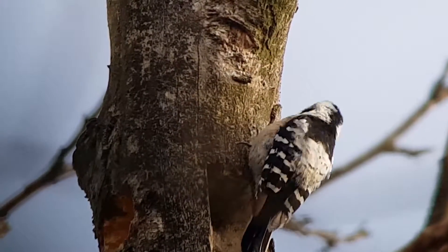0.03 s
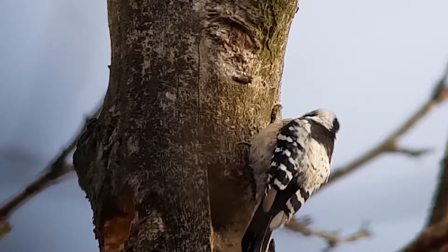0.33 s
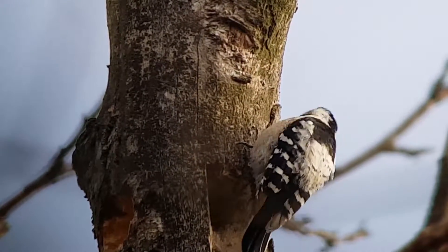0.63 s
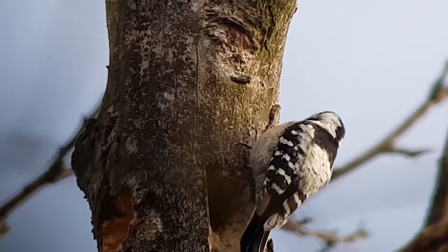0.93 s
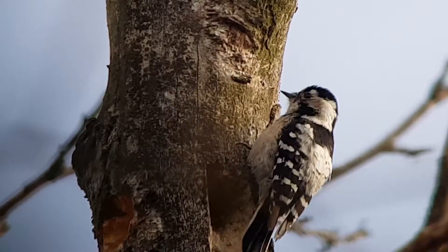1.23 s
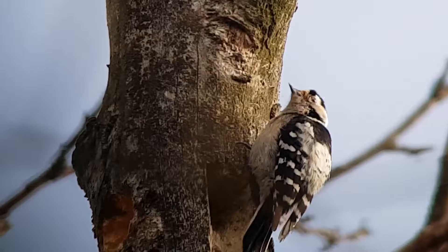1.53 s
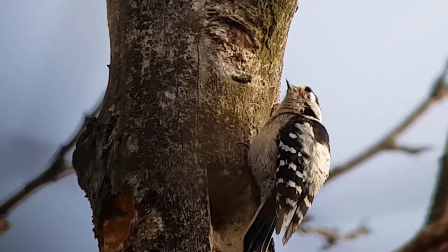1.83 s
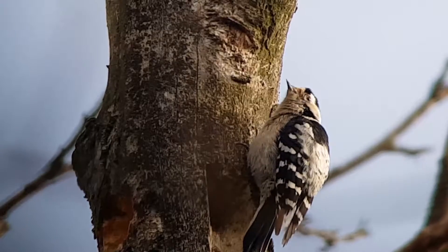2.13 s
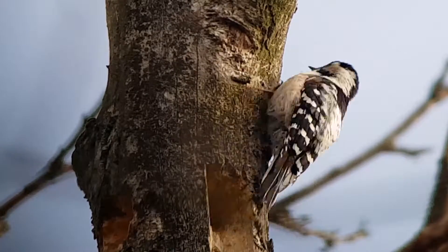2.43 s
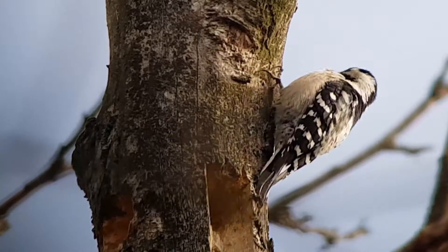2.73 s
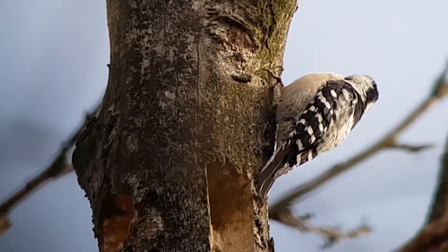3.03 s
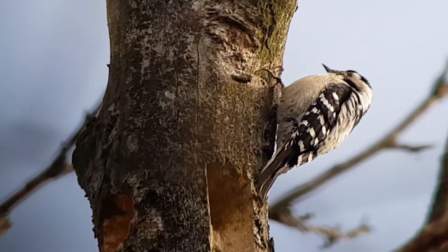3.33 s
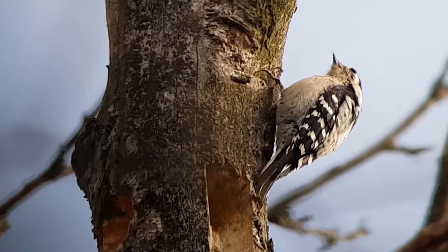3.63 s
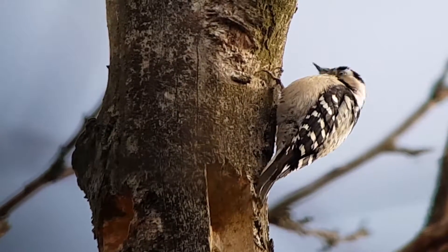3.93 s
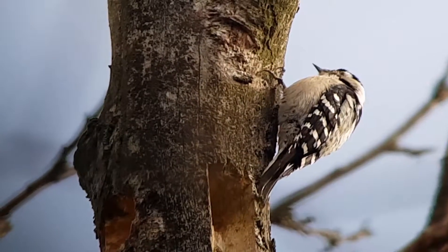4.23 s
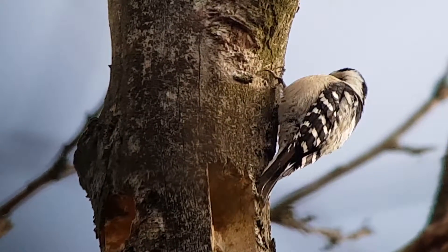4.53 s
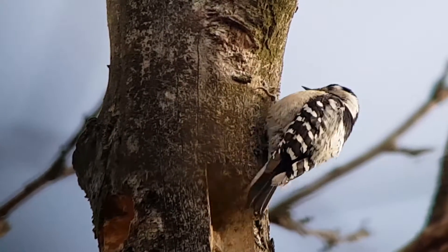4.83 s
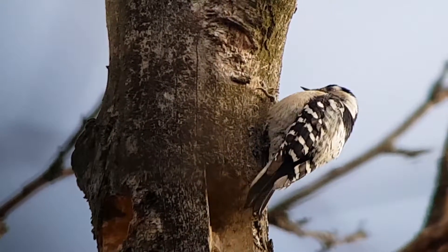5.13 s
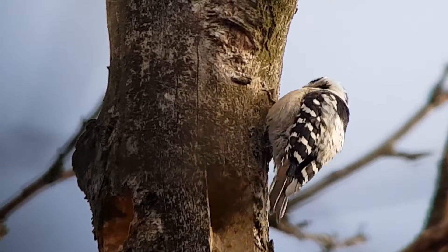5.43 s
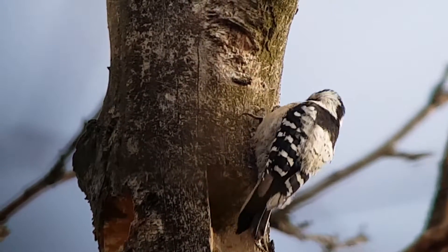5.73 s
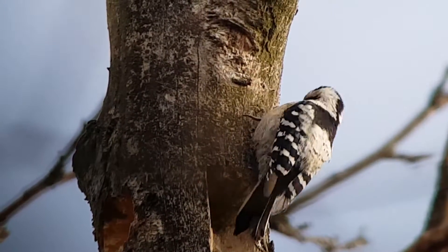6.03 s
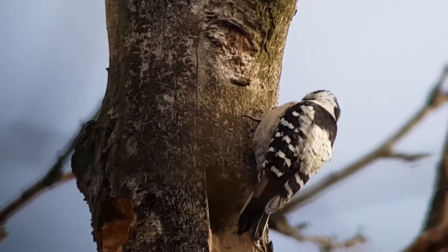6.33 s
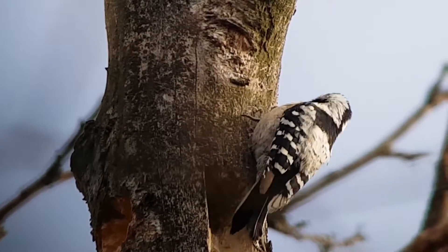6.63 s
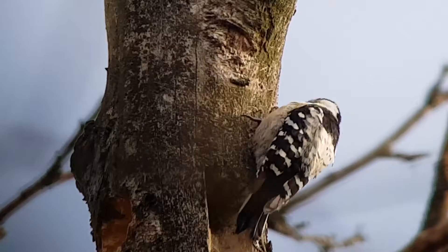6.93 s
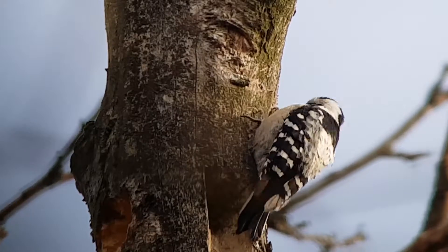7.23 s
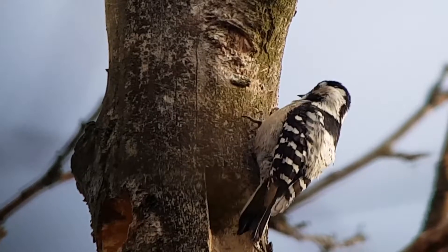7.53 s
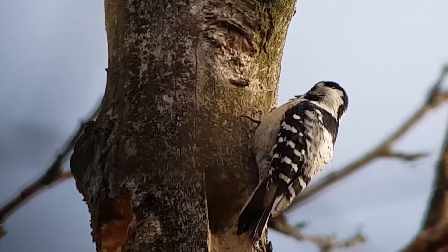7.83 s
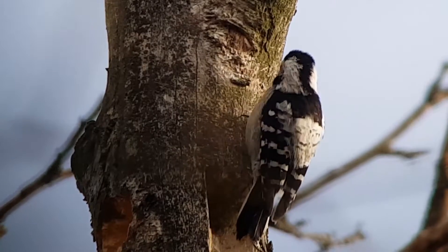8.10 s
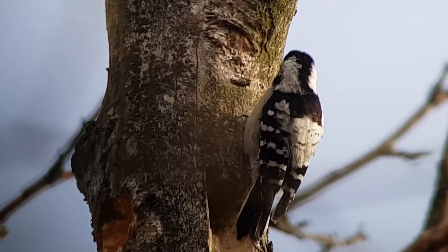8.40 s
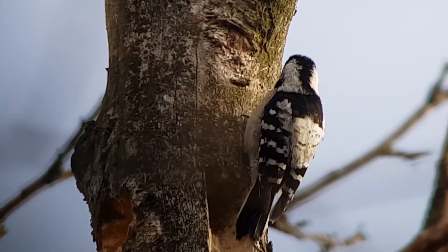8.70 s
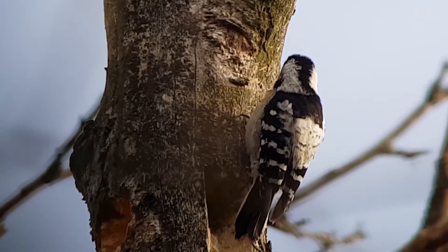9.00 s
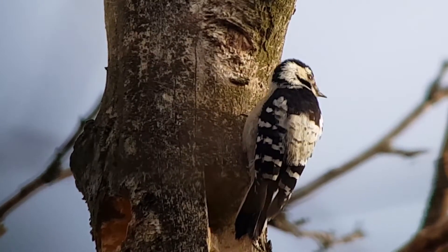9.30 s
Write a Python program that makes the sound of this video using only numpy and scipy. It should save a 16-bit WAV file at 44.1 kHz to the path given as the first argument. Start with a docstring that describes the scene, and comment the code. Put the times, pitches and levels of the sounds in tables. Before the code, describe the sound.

A woodpecker is already drumming on a dead trunk at the start, a fast, even roll of hollow wooden knocks that stops at about 1 second with a faint scratch on bark. A small songbird then gives thin, high, level whistles, alternating them with swooping notes from about 3 to 7 seconds. Farther off, other birds chirp and chatter, with short, hoarse trills near 1, 3.7 and 7 seconds. At about 5.8 seconds a second, longer roll starts softly, grows, and slows before ending at 7.5 seconds. A tiny bark tick and a faint run of short, quick calls follow between 8 and 9 seconds. The drumming is the loudest and nearest sound, while the birds echo among the trees. A low, distant rumble and faint hiss continue throughout, with a few soft puffs of wind on the microphone between 2.5 and 5 seconds.

```python
"""In quiet woodland, a small woodpecker drums two rolls on a dead trunk: each blow of the bill excites
the wood's damped modes, and claws and bill scratch the bark. A tit answers with thin, level whistles
and swooping notes while other birds chatter farther off, each note a frequency-modulated pure tone.
Scattering from the trees makes the birds reverberate over a low, distant rumble, a faint hiss
and a few soft puffs of wind."""
import sys
import numpy as np
from scipy import signal
from scipy.fft import rfft, irfft
from scipy.io import wavfile
from scipy.ndimage import uniform_filter1d

SR = 44100
rng = np.random.default_rng(int(sys.argv[2]) if len(sys.argv) > 2 else 0)


def persist_wave(psi):
    """Save psi, clipped to +-1, as 16-bit WAV."""
    counts = np.round(np.clip(psi, -1, 1) * 32767).astype(np.int16)
    wavfile.write(sys.argv[1], SR, np.atleast_2d(counts).T)


N = 417186


def woodpecker(near_db=-13, near_t60=0.043, echo_db=-11, mode_vary_db=1.9, click_t60=0.017, spread=3.35):
    """Impact excitation: each blow rings the trunk's modes; nearby limbs, then the trees, reflect it."""
    # Modes of the trunk. Each row: frequency in Hz, bandwidth in Hz, relative level in dB.
    trunk = [(617, 112, -9.5), (663.4, 35, -4), (927, 28, -10), (1132, 167, 0), (1353, 130, -7),
             (1524, 245, -4), (1770, 85, -10), (2070, 170, 3), (2223, 186, 1.5), (2560, 86, -18)]
    # Spectrum of the bill's click. Each row: frequency in Hz, relative level in dB.
    click_spectrum = [(200, -49), (900, -51), (2500, -30.5), (3000, -20), (3300, -27.5), (4150, -22.5),
                      (4500, -28.5), (5200, -29.5), (6500, -40.5), (8500, -49), (15000, -70)]
    lead_s = .2  # the first roll is already under way
    lead = round(lead_s * SR)
    hz, t = np.fft.rfftfreq(4096, 1 / SR), np.arange(4096) / SR
    direct, around = np.zeros((2, N + lead))
    # heard from all sides at once, the modes blur together
    broad_power = sum((amp(db) / (1 + (2 * (hz - f) / (spread * w)) ** 2)) ** 2 for f, w, db in trunk)
    blurred = minimum_phase(np.sqrt(broad_power / spread))
    # an all-pass delay: the main resonance takes a moment to build up
    build_up = np.exp(-2j * np.arctan(np.pi * 0.00033 * (hz - 2150)))
    bill = minimum_phase(amp(spectrum_at(click_spectrum, hz)))
    for s, blow_db, click_db in blows():
        power = sum((amp(db + mode_vary_db * rng.standard_normal()) / (1 + (2 * (hz - f) / w) ** 2)) ** 2
                    for f, w, db in trunk)
        knock = irfft(rfft(minimum_phase(np.sqrt(power))) * build_up)
        scuff = rng.standard_normal(len(t)) * amp(-60 * t / click_t60)
        click = amp(click_db - 2.2) * signal.fftconvolve(scuff / np.linalg.norm(scuff), bill)[:len(t)]
        gain = amp(blow_db) / np.sqrt(np.mean((knock + click)[:220] ** 2))  # sets the first 5 ms rms
        add(direct, s + lead_s, gain * (knock + click))
        add(around, s + lead_s, gain * (blurred + click))
    limbs = rng.standard_normal((2, len(t))) * (t > .005) * amp(-60 * t / near_t60)
    limbs = limbs + 0.047 * limbs[::-1]  # both sides hear partly the same limbs
    near = signal.oaconvolve(around[None], limbs / np.linalg.norm(limbs[0]), axes=1)[:, :len(around)]
    return panned(direct + amp(near_db) * near + amp(echo_db) * forest(around), left_db=1.1)[:, lead:]


def blows(jitter_s=.0002, force_vary_db=1.3, click_vary_db=1.5):
    """A nearly periodic impulse train: the bill bounces at a beat that lengthens as the bird tires."""
    # Drum rolls. Each row: start, end, beat and lengthening of the last beat, all in seconds,
    # then the number of blows over which the bird tires.
    rolls = [(-.0981, 1.1, .04652, .0021, 8), (5.7869, 7.51, .0466, .00808, 3)]
    # How hard and how squarely the bill strikes, one curve a roll.
    # Each row: time in seconds, level of the blow in dB, relative level of its click in dB.
    drives = [
        [(.04, -39.5, 5), (.2, -36.5, 0), (.42, -40, -2), (.51, -36, -6), (.555, -43.5, -1), (.62, -38.5, -6),
         (.73, -36, 2.5), (.83, -38.5, -9), (.93, -38.5, -1), (1.08, -39, 8)],
        [(5.785, -49, 6), (5.93, -45.5, 6), (6.06, -38.5, 1.5), (6.15, -42.5, 4), (6.255, -36.5, 4),
         (6.33, -40.5, 12), (6.42, -46, 8), (6.54, -38, 6.5), (7.08, -38, 4), (7.27, -41.5, -1),
         (7.42, -44, 13.5), (7.49, -41.5, 8)],
    ]
    strikes = []
    for (s, end, beat, slowing, tiring), drive in zip(rolls, drives):
        when, force, sharpness = np.transpose(drive)
        count = int((end - s - slowing * tiring) / beat) + 1
        for k, (late, harder, sharper) in enumerate(rng.standard_normal((count, 3))):
            blow_db = np.interp(s, when, force) + force_vary_db * harder
            click_db = np.interp(s, when, sharpness) + click_vary_db * sharper
            strikes.append((s + jitter_s * late, blow_db, click_db))
            s += beat + slowing * np.exp((k + 2 - count) / tiring)
    return strikes


def bark_scratches(band_hz=(1500, 9000), echo_db=-20):
    """Friction: claws and bill catch on the bark in decaying bursts of grainy noise."""
    # Ticks and scratches. Each row: start in seconds, length in seconds, relative level in dB.
    scratches = [(0.991, 0.11, -67), (1.088, 0.13, -68), (8.291, 0.0044, -59), (8.544, 0.003, -75)]
    bursts = np.zeros(N)
    for s, length, db in scratches:
        t = np.arange(0, length, 1 / SR)
        grains = unit_rms(rng.standard_normal(len(t)) ** 3)
        add(bursts, s, amp(db) * 2 * grains * np.exp(-2 * t / length))
    direct = bandpass(bursts, band_hz)
    return direct + amp(echo_db) * forest(direct)


def tit(drop_hz=750, settle_s=0.0073, warble_hz=35, whistle_echo_db=-7, swoop_echo_db=-4):
    """Frequency modulation: whistles drop onto a held pitch; swoops dip and climb back with a warble."""
    # Level whistles. Each row: start and length in seconds, pitch and rise in Hz, nominal level in dB.
    whistles = [(0.997, 0.09, 5100, 40, -52), (1.571, 0.11, 5020, -2, -63.5), (2.277, 0.084, 5095, 36, -53),
                (2.466, 0.048, 5100, -41, -54), (3.319, 0.15, 5146, 107, -53.5),
                (4.083, 0.13, 5193, 33, -53.5), (4.84, 0.16, 5105, 40, -54), (5.692, 0.15, 5084, 50, -57),
                (6.523, 0.15, 5010, 187, -53), (7.520, 0.13, 4986, 128, -53.5),
                (7.858, 0.13, 5100, 2, -61.5), (8.663, 0.077, 5060, 68, -50)]
    # Swooping notes. Each row: start in seconds, lowest pitch in Hz, depth factor, nominal level in dB.
    swoops = [(2.933, 5760, 0.69, -52.5), (3.666, 5270, 1, -48.5), (4.45, 5220, 1, -50),
              (5.226, 5170, 1, -54), (6.061, 5180, 1, -54), (6.952, 5110, 0.84, -53.5)]
    # Course of one swoop. Each row: age in seconds, height above the lowest pitch in Hz at depth 1,
    # relative level in dB, warble depth in Hz.
    swoop_course = [(0, 1758, -15, -4), (.016, 883, -9.5, 3), (.036, 243, -5, 1), (0.061, 2.2, -1, 20),
                    (.08, 155, -6, 0), (.1, 397, -4.5, 101), (0.136, 904, -11, 241),
                    (0.177, 1538, -17, 221)]
    direct, scattered = np.zeros((2, N))
    for s, length, hz, rise, db in whistles:
        t = np.arange(0, length, 1 / SR)
        onset = np.exp(-t / settle_s)
        pitch = hz + drop_hz * onset + rise * (t / length) ** 2
        note = amp(db) * (1 - onset) ** 1.24 * syrinx(pitch, waver=0.005)
        add(direct, s, clear_path(db, near_db=-52) * note)
        add(scattered, s, amp(whistle_echo_db) * note)
    age, *curves = np.transpose(swoop_course)
    t = np.arange(0, age[-1], 1 / SR)
    height, shape_db, warble = (uniform_filter1d(np.interp(t, age, curve), 300) for curve in curves)
    for s, hz, depth, db in swoops:
        pitch = hz + depth * height + warble * np.sin(2 * np.pi * warble_hz * t)
        note = amp(db + shape_db) * syrinx(pitch, waver=0.0053)
        add(direct, s, clear_path(db + shape_db, near_db=-56.5) * note)
        # the quiet, high ends of the note scatter most
        add(scattered, s, amp(swoop_echo_db - 0.45 * shape_db) * note)
    return direct + forest(scattered)


def small_birds(warble_hz=33, echo_db=-2):
    """Frequency sweeps: thin glides from the crowns, some warbled by a sinusoid, some repeated."""
    # High calls. Each row: start and length in seconds, first and last pitch in Hz,
    # nominal level in dB, warble depth in Hz.
    thin_calls = [(0.105, 0.11, 3980, 3220, -63.5, 150), (.24, 0.029, 4200, 5000, -63, 0),
                  (0.319, 0.03, 4310, 5200, -60.5, 3), (.554, 0.061, 6820, 7000, -74, 305),
                  (0.905, .065, 4100, 3450, -67, 0), (1.848, .1, 7500, 7700, -75, 60),
                  (2.057, 0.028, 4360, 4823, -57.5, 0), (2.123, 0.052, 7100, 7050, -63.5, 320),
                  (2.568, 0.033, 6000, 7630, -60.5, -2), (2.619, 0.06, 7670, 6800, -55.5, 74),
                  (2.685, .11, 6350, 5660, -61.5, 653), (3.127, 0.027, 8900, 7600, -65, 0),
                  (3.553, .059, 7270, 7350, -71, 347), (5.291, 0.16, 7500, 7800, -72.5, 0),
                  (5.61, .05, 7900, 7620, -71, -2), (7.748, 0.043, 6800, 3930, -64.5, -2),
                  (8.032, 0.15, 8600, 7460, -67.5, 100), (9.425, 0.042, 7150, 7000, -61, 196)]
    # Evenly repeated rising calls. Each row: start, end, spacing and note length in seconds,
    # first and last pitch in Hz, nominal level in dB.
    repeats = [(5.518, 6.6, .457, .11, 4274, 4446, -67.5), (8.739, 9.15, .168, 0.039, 4460, 4680, -71)]
    direct, scattered = np.zeros((2, N))
    repeated = [(s, *call, 0) for start, end, gap, *call in repeats for s in np.arange(start, end, gap)]
    for s, length, first, last, db, warble in thin_calls + repeated:
        t = np.arange(0, length, 1 / SR)
        pitch = glide(length, first, np.sqrt(first * last), last)
        note = amp(db) * syrinx(pitch + warble * np.sin(2 * np.pi * warble_hz * t), waver=0.01)
        add(direct, s, clear_path(db, near_db=-46, slope=0.15) * note)
        add(scattered, s, note)
    return direct + amp(echo_db) * forest(scattered)


def chatter(trill_hz=(4255, 3210, 2830), trill_note_s=0.029, sag_octaves=0.1017,
            direct_db=-5.5, scattered_db=2.7):
    """Random pitch modulation broadens trills and slurs into hoarse notes, half lost in their echoes."""
    # Runs of falling notes. Each row: start, end and spacing in seconds, relative level and echo in dB.
    trills = [(1.001, 1.35, 0.078, -58.5, -1), (3.677, 3.99, 0.064, -60, -4.5),
              (7.013, 7.29, .08, -59.5, -3.5)]
    # Single slurs. Each row: start and length in seconds, middle pitch in Hz, sweep in octaves,
    # relative level in dB.
    slurs = [(1.438, 0.089, 2853, -.8, -57.5), (1.626, 0.056, 2705, -0.67, -61.5),
             (1.827, 0.065, 2958, -.7, -57), (2.112, 0.041, 2867, -0.52, -60.5),
             (2.811, 0.052, 3754, .23, -64.5), (4.156, 0.042, 2840, 0.083, -62),
             (4.344, 0.058, 2810, 0, -63), (4.89, 0.029, 2960, -0.54, -67.5),
             (5.032, 0.091, 3157, 0.66, -66.5), (7.413, .065, 2720, -0.54, -58.5),
             (7.579, 0.033, 3654, 0.69, -57.5), (8.228, .085, 3493, .6, -65),
             (8.882, 0.072, 1530, 0.041, -78.5), (9.25, 0.031, 3910, -0.16, -69)]
    notes = []
    for start, end, gap, db, echo_db in trills:
        for s in np.arange(start, end, gap):
            detune = 1 + 0.029 * rng.standard_normal()
            notes.append((s, glide(trill_note_s, *trill_hz) * detune, db, echo_db))
    for s, length, hz, sweep, db in slurs:
        first, last = hz * 2 ** (sag_octaves - sweep / 2), hz * 2 ** (sag_octaves + sweep / 2)
        notes.append((s, glide(length, first, hz, last), db, -1.5))
    direct, scattered = np.zeros((2, N))
    for s, pitch, db, echo_db in notes:
        add(direct, s, amp(db) * syrinx(pitch, waver=0.0336, flutter_db=3))
        add(scattered, s, amp(db + echo_db) * syrinx(pitch, waver=0.1, flutter_db=3.5))
    return amp(direct_db) * direct + amp(scattered_db) * forest(scattered)


def yips(start_s=8.073, end_s=9.07, gap_s=.1055, note_s=0.0259, middle_hz=3430, db=-69.5, echo_db=-1):
    """Parabolic sweeps: an even run of short notes, each arching up and falling away."""
    direct = np.zeros(N)
    for s in np.arange(start_s, end_s, gap_s):
        hz = middle_hz * (1 + 0.0296 * rng.standard_normal())
        add(direct, s, amp(db) * syrinx(glide(note_s, .9 * hz, hz, 0.74 * hz), waver=0.015))
    return direct + amp(echo_db) * forest(direct)


def far_chorus(notes_per_s=26, bend_share=0.454, note_s=.03):
    """The diffuse field: birds so far away that only the echoes of their quick slurs arrive."""
    # Distant phrases. Each row: start and end in seconds, lowest and highest pitch in Hz, level in dB.
    phrases = [(0, 0.999, 2990, 6260, -72.5), (1.047, 2.352, 2400, 4690, -71.5),
               (2.499, 3.148, 1688, 4650, -76), (3.678, 4.751, 2615, 4664, -71.5),
               (3.7, 5.105, 1416, 3180, -88), (4.148, 5.004, 7300, 8430, -82),
               (5.91, 6.302, 6970, 8900, -76.5), (6.2, 7.202, 4270, 7220, -71),
               (6.901, 7.625, 2390, 4460, -64), (7.751, 9.398, 2580, 5200, -78.5)]
    scattered = np.zeros(N)
    for start, end, low_hz, high_hz, db in phrases:
        count = int((end - start) * notes_per_s) + 4
        note_gain = amp(db) * np.sqrt((end - start) / (count * note_s))
        for k, (when, height, slope) in enumerate(rng.random((count, 3))):
            hz = low_hz * (high_hz / low_hz) ** height
            bend = bend_share * (slope - .5) * hz
            note = syrinx(glide(note_s, hz + bend, hz, hz - bend), waver=0.0286)
            add(scattered, start + (end - start) * (k + when) / count, note_gain * note)
    return forest(scattered)


def syrinx(hz, waver, flutter_db=2, edge_s=.0035):
    """A bird's oscillator: a pure tone with slight random modulation of frequency and amplitude."""
    cycles = np.cumsum(hz * (1 + waver * wander(len(hz), size=90))) / SR
    envelope = signal.windows.tukey(len(hz), 2 * edge_s * SR / len(hz))
    flutter = amp(flutter_db * wander(len(hz), size=350))
    return np.sqrt(2) * flutter * envelope * np.sin(2 * np.pi * cycles)


def clear_path(db, near_db, slope=0.7):
    """Attenuation of the direct path: fainter notes come from deeper among the branches."""
    return amp(slope * np.minimum(db - near_db, 0))


def forest(x, coherence=0.61, build_s=0.0067, near_db=7, near_t60=0.13):
    """Multiple scattering: a dense cluster from the nearest trunks, then each band dies at its rate."""
    # Reverberation of the wood. Each row: frequency in Hz, time to decay by 60 dB in seconds.
    decay_times = [(300, 0.97), (1200, 0.76), (2500, 0.39), (5000, 0.92), (8000, 0.39)]
    reflections = rng.standard_normal((2, SR)) * (rng.random((2, SR)) < .1)
    hz, t, spectra = signal.stft(reflections, SR, nperseg=256)
    t60 = spectrum_at(decay_times, hz)[:, None]
    decay = np.hypot(amp(-60 * t / t60), amp(near_db - 60 * t / near_t60))
    left, independent = signal.istft(spectra * decay * (1 - np.exp(-t / build_s)), SR, nperseg=256)[1]
    tail = stereo_pair(left, independent, coherence) / np.linalg.norm(left)
    return signal.oaconvolve(x[None], tail, axes=1)[:, :len(x)]


def air(rumble_db=-53, hiss_db=-70.5, swell_top_hz=170, drift_db=1, lumps_db=0.2):
    """Spectrally shaped noise: a swelling, lumpy low rumble under a steady, faint hiss."""
    # Spectra of the rumble and the hiss. Each row: frequency in Hz, relative density in dB.
    rumble_spectrum = [(12, -47), (20, -23), (48, -2), (69, -1), (119, -8.5), (155, -17), (195, -17.5),
                       (298, -19), (375, -22), (413, -20), (441, -22), (675, -27), (1000, -40.5),
                       (1300, -58), (2200, -120)]
    hiss_spectrum = [(500, -20), (1000, 2.5), (2000, 1.5), (3500, 1.5), (6000, 3), (8800, -4),
                     (11000, -0.5), (16000, -0.5)]
    # Likeness of left and right. Each row: frequency in Hz, coherence from 0 to 1.
    likeness = [(30, 1), (100, 0.99), (200, 0.97), (600, 0.83), (1500, 0.36), (5000, 0.56), (15000, 0.47)]
    # Slow swell of the rumble. Each row: time in seconds, relative level in dB.
    swell = [(0, -52), (1.6, -56), (2.9, -51.5), (3.7, -55.5), (4.9, -51), (5.4, -52.5), (5.7, -57),
             (6.2, -51.5), (8.1, -54.5), (9.4, -52)]
    hz, t = np.fft.rfftfreq(4096, 1 / SR)[:, None], np.arange(N // 1024 + 5) * 1024 / SR

    def noise(db):
        """Fourier synthesis of stereo noise at rms 1, shaped over frequency and time."""
        a, b, c, d = rng.standard_normal((4, len(hz), len(t)))
        spectra = stereo_pair(a + 1j * b, c + 1j * d, spectrum_at(likeness, hz))
        return unit_rms(signal.istft(spectra * amp(db), nperseg=4096, noverlap=3072)[1][:, :N])
    swell_db = np.interp(t, *np.transpose(swell)) + lumps_db * wander(len(t), size=3)
    low_swell_db = (swell_db - swell_db.mean()) / (1 + (hz / swell_top_hz) ** 2)
    rumble = noise(spectrum_at(rumble_spectrum, hz) + low_swell_db + drift_db * wander(len(t), size=5))
    hiss = noise(spectrum_at(hiss_spectrum, hz))
    return panned(amp(rumble_db) * rumble, left_db=.5) + amp(hiss_db) * hiss


def breeze(band_hz=(35, 130)):
    """Turbulent pressure: short, low puffs of air strike one side of the microphone."""
    # Buffets of wind. Each row: start in seconds, length in seconds, peak level in dB before panning.
    buffets = [(2.544, 0.085, -47.5), (3.079, 0.13, -51.5), (4.196, 0.088, -53), (4.955, 0.13, -55)]
    turbulence = unit_rms(bandpass(rng.standard_normal(N), band_hz))
    envelope = np.zeros(N)
    for s, length, db in buffets:
        add(envelope, s, amp(db) * np.hanning(int(length * SR)))
    return panned(envelope * turbulence, left_db=9)


def glide(length, first, middle, last):
    """Quadratic interpolation: a pitch curve bent through three points."""
    t = np.arange(0, length, 1 / SR)
    return np.polyval(np.polyfit([0, .5, 1], [first, middle, last], 2), t / length)


def minimum_phase(gain):
    """Causality: the impulse response whose phase follows from its log gain over frequency."""
    log_gain = np.log(np.r_[gain, gain[-2:0:-1]] + 1e-5)
    return np.fft.ifft(np.exp(np.conj(signal.hilbert(log_gain)))).real


def wander(count, size):
    """Moving averages smooth noise into a random curve of rms near 1."""
    noise = rng.standard_normal(count + 4 * size)
    return unit_rms(uniform_filter1d(uniform_filter1d(noise, size), size))[2 * size:][:count]


def bandpass(x, band_hz):
    """Filtering: attenuates what lies outside the band."""
    return signal.sosfilt(signal.butter(2, band_hz, "band", fs=SR, output="sos"), x)


def spectrum_at(points, hz):
    """Interpolation on a log-frequency axis."""
    f, value = np.transpose(points)
    return np.interp(np.log(hz + 1), np.log(f + 1), value)


def stereo_pair(left, independent, coherence):
    """Partial coherence: the right channel shares part of the left."""
    return np.array([left, coherence * left + np.sqrt(1 - coherence ** 2) * independent])


def panned(x, left_db):
    """A level difference places a sound between the channels."""
    return x * amp([[left_db / 2], [-left_db / 2]])


def add(mix, s, sound):
    """Superposition: mixes a sound in at s seconds."""
    part = mix[max(round(s * SR), 0):][:len(sound)]
    part += sound[:len(part)]


def amp(db):
    """Decibels to amplitude ratio."""
    return 10 ** (np.asarray(db) / 20)


def unit_rms(x):
    """Normalisation to rms 1."""
    return x / np.sqrt(np.mean(x ** 2) + 1e-20)


def scene():
    """Superposition of all the birds and the air of the wood."""
    birds = woodpecker() + bark_scratches() + tit() + small_birds() + chatter() + yips() + far_chorus()
    return birds + air() + breeze()


def record(dry):
    """Band limiting: a steep low-pass filter at 15850 Hz."""
    return signal.oaconvolve(dry, signal.firwin(511, 15850, window=("kaiser", 9), fs=SR)[None], "same")


dry = scene()
out = record(dry)
persist_wave(out)
```